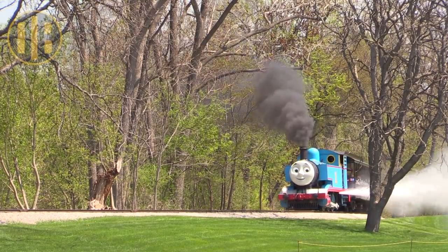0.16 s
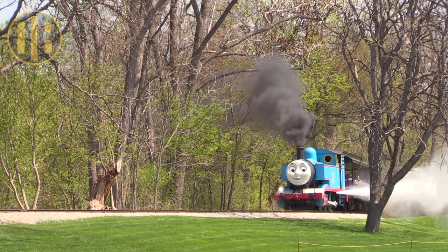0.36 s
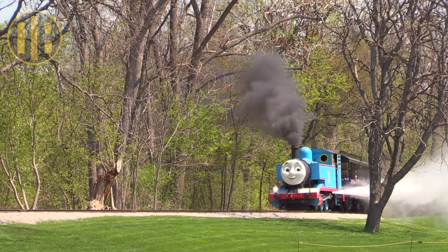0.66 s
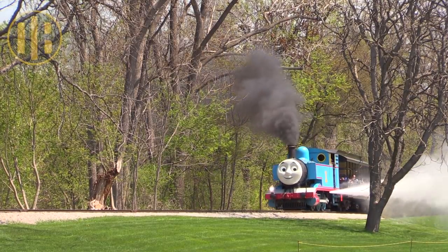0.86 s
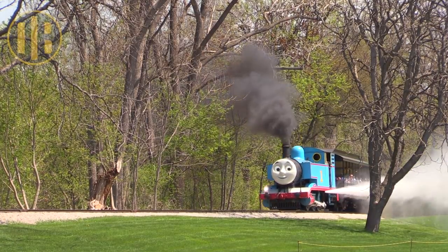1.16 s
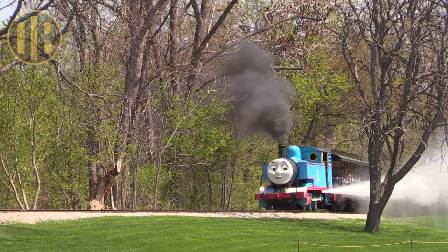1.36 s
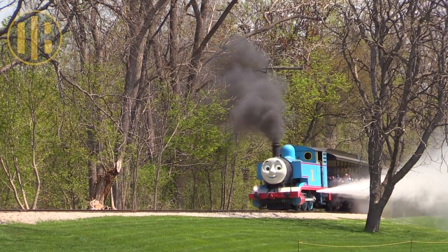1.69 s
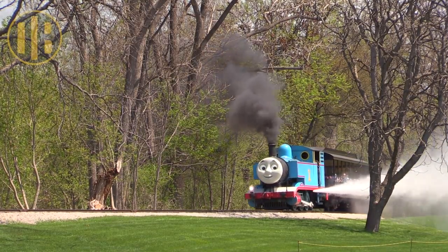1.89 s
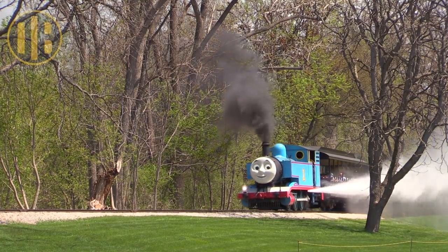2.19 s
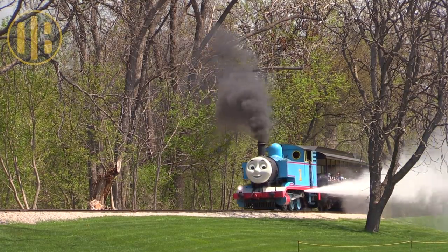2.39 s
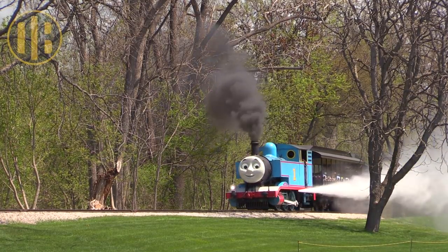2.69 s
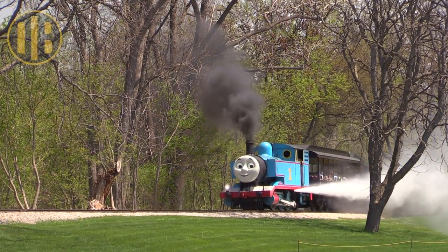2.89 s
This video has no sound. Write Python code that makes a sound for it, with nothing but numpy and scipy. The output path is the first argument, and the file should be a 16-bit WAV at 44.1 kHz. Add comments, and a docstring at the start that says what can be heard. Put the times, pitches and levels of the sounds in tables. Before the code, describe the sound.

Continuous venting steam dominates from start to end, broad and rushing, with tiny pops and a quiet lumpy rumble. A dull low rush fades early. One distant microphone outdoors near trees, with slightly overloaded peaks.

```python
"""A broad, steady hiss is heard first: a jet of steam from the side of a locomotive creeping along some way off.
The jet is coloured noise in overlapping bands; their levels swell and fade, and weak echoes ripple its colour.
A fine crackle of filtered random pulses rides on top; the engine rumbles beneath as low, lumpy noise.
A dull rush of low noise fades from the start, and the loudest peaks slightly overload the recorder."""
import sys
import numpy as np
from scipy import signal
from scipy.fft import rfft, irfft, next_fast_len
from scipy.io import wavfile
from scipy.ndimage import uniform_filter1d, minimum_filter1d, map_coordinates

SR = 44100
rng = np.random.default_rng(int(sys.argv[2]) if len(sys.argv) > 2 else 0)


def master(y):
    """Save y as 16-bit WAV."""
    cut = np.clip(np.atleast_2d(y).T, -1, 1)
    pcm = np.round(cut * 32767)  # scale
    wavfile.write(sys.argv[1], SR, pcm.astype(np.int16))


N = 134505
TIME = np.arange(N) / SR  # s


def from_db(db):
    """Amplitude ratio: 20 dB is a factor of ten."""
    return 10 ** (np.asarray(db) / 20)


def rms_one(x):
    """Normalisation by the root mean square, which becomes 1."""
    return x / np.sqrt(np.mean(x ** 2) + 1e-20)


def in_time(rows):
    """Linear interpolation of each column after the first (time [s]) at every sample."""
    seconds, *columns = np.transpose(rows)
    return np.array([np.interp(TIME, seconds, column) for column in columns])


def drift(rate_hz):
    """Low-pass filtered noise: a slow random wander with a spread of about 1."""
    step = 40  # samples between the points of the wander
    pole = np.exp(-2 * np.pi * rate_hz * step / SR)
    settle = 2000  # points dropped while the filter settles
    noise = rng.standard_normal(N // step + 2 + settle)
    slow = signal.lfilter([1], [1, -2 * pole, pole * pole], noise)[settle:]
    return np.interp(np.arange(N) / step, np.arange(len(slow)), rms_one(slow))


def coloured_noise(spectrum):
    """Spectral shaping of white noise: a looping hiss of the given colour, rms 1."""
    size = next_fast_len(N)
    hz = np.maximum(np.arange(size // 2 + 1) * SR / size, 1)
    points_hz, db = np.transpose(spectrum)
    # beyond the end points the spectrum falls by 12 dB per octave
    ends = np.minimum(1, np.minimum(hz / points_hz[0], points_hz[-1] / hz)) ** 2
    gain = ends * from_db(np.interp(np.log(hz), np.log(points_hz), db))
    return rms_one(irfft(rfft(rng.standard_normal(size)) * gain, size))


def split_bands(x, count=30):
    """Superposition: overlapping bands that sum to x, as (centre [Hz], signal)."""
    log_hz = np.log(np.maximum(np.arange(len(x) // 2 + 1) * SR / len(x), 1))
    centres_hz = np.geomspace(350, 10000, count)
    whole = rfft(x)
    bands = []
    for hz, pick in zip(centres_hz, np.eye(count)):
        weight = np.interp(log_hz, np.log(centres_hz), pick)  # triangle on a log frequency axis
        bands.append((hz, irfft(whole * weight, len(x))[:N]))
    return bands


def steam_jet():
    """Turbulent jet noise: each band follows the slow swell of its range and flutters by itself."""
    # mean colour of the jet, relative: (frequency [Hz], density [dB per Hz])
    jet_colour = [(150, -19), (250, -23), (350, -14.5), (430, -11), (530, -5.5), (680, -4), (850, -2),
                  (1250, 0.5), (1850, -0.5), (2500, 0.1), (2950, -1), (3500, -4), (4200, -12), (5200, -20),
                  (7000, -33), (10000, -51.5), (13000, -61.5), (16000, -67)]
    # lower ranges: (time [s], 500-1100 Hz [dB], 1100-1750 Hz [dB], 1750-2350 Hz [dB], 2350-3050 Hz [dB])
    lower_levels = [(0.0, -19, -22, -20.0, -16.5), (0.12, -19.5, -19.5, -15.5, -16.5),
                    (0.26, -18.5, -19, -14.5, -11.5), (0.45, -18.5, -18.5, -12, -14),
                    (0.62, -19.0, -16, -17.5, -15), (0.78, -19.5, -11.5, -15.5, -15.5),
                    (0.95, -18.5, -14.5, -17, -12), (1.15, -18.5, -16.5, -20, -14.5),
                    (1.38, -16.5, -17.5, -20, -14.5), (1.55, -16, -16, -17, -14.5),
                    (1.72, -16.0, -14, -15.5, -12), (1.95, -16.5, -15.5, -14.5, -12),
                    (2.17, -17, -14, -15.0, -12.5), (2.35, -17.5, -15.5, -16.0, -14),
                    (2.55, -18, -12.5, -17, -19.5), (2.72, -18.0, -15.5, -16, -16.5),
                    (2.87, -17.5, -16.5, -17, -15.5), (3.05, -18.5, -16, -15.5, -16)]
    # treble: (time [s], 3-4.2 kHz [dB], 4.4-6 kHz [dB], 6.3-8.5 kHz [dB])
    treble_levels = [(0.0, -14.5, -28, -36.5), (0.12, -15.5, -24.5, -38.5), (0.26, -14, -26.5, -41.5),
                     (0.45, -14, -28.0, -41.0), (0.62, -13.5, -26, -45), (0.78, -18.5, -28.5, -39.5),
                     (0.95, -19, -30.5, -44), (1.15, -20.5, -32, -47.5), (1.38, -17.5, -32.0, -47),
                     (1.55, -16, -27, -40.5), (1.72, -15.5, -24.5, -40.0), (1.95, -16.5, -26, -41.0),
                     (2.17, -16, -30.5, -39.5), (2.35, -25.5, -29.5, -44.0), (2.55, -25.5, -30, -46.5),
                     (2.72, -22.5, -40, -48.5), (2.87, -22.0, -36, -48), (3.05, -20.5, -30.5, -43.5)]
    # centres of these seven ranges, low to high: (frequency [Hz], ...)
    range_centres_hz = (880, 1380, 2050, 2700, 3550, 5100, 7300)
    jet_db = -12
    flutter_db, flutter_hz = 0.74, 5.5  # turbulence shakes each band by itself
    surge_db, surge_hz = 0.52, 16       # and the whole jet together

    levels_db = np.vstack([in_time(lower_levels), in_time(treble_levels)])
    swells_db = levels_db - levels_db.mean(axis=1, keepdims=True)
    hiss = 0
    for hz, band in split_bands(coloured_noise(jet_colour)):
        # a band between two range centres shares the swells of both
        shares = np.array([np.interp(np.log(hz), np.log(range_centres_hz), pick)
                           for pick in np.eye(len(swells_db))])
        band_db = shares @ swells_db + flutter_db * drift(flutter_hz)
        hiss = hiss + band * from_db(band_db)
    return hiss * from_db(jet_db + surge_db * drift(surge_hz))


def reflected(x):
    """Interference: weak echoes on wandering paths lay a shifting ripple over the colour."""
    # reflections off the engine, the ground and tree trunks: (mean delay [ms], level [dB])
    echoes = [(3.4, -22), (8.9, -24.5), (12.95, -18.5)]
    wander_ms, wander_hz = 0.1, 0.6  # moving air and the engine's creep shift each path
    out = x
    for delay_ms, db in echoes:
        lag = (delay_ms + wander_ms * drift(wander_hz)) * SR / 1000  # samples
        echo = map_coordinates(x, [np.arange(N) - lag], order=3, mode="mirror")
        out = out + from_db(db) * echo
    return out


def crackle():
    """Random impulses through a band-pass: sharp pops that grow denser and stronger together."""
    # crackle above 10 kHz, used as the swing about its mean: (time [s], level [dB])
    crackle_level = [(0.03, -65), (0.07, -65), (0.24, -56), (0.4, -63.5), (0.53, -51.5), (0.54, -59),
                     (0.83, -62), (1.18, -70), (1.53, -64), (1.55, -57), (1.6, -60.5), (1.72, -54.5),
                     (1.74, -60.5), (2.11, -60.5), (2.57, -70), (3.0, -67)]
    pops_per_s, smallest_db = 260, -36.5      # at the mean level, before the band-pass
    spread_db = 3                             # scale of the exponential spread of sizes
    rate_follows, size_follows = 0.7, 0.94    # shares of the swing

    level_db, = in_time(crackle_level)
    swing_db = level_db - level_db.mean()
    born = rng.random(N) < pops_per_s * from_db(rate_follows * swing_db) / SR
    excess_db = spread_db * np.minimum(rng.exponential(1, N), 4)
    sizes = from_db(smallest_db + size_follows * swing_db + excess_db)
    pulses = born * sizes * rng.choice([-1, 1], N)
    band_pass = signal.butter(1, (6000, 10000), "band", fs=SR, output="sos")
    return signal.sosfilt(band_pass, pulses + 1e-18)


def engine_rumble():
    """Amplitude-modulated low noise: the lumpy rumble of the fire and the rolling engine."""
    # colour of the rumble, relative: (frequency [Hz], density [dB per Hz])
    rumble_colour = [(20, -16), (32, -15), (46, -3), (85, -1.5), (135, 0.5), (185, -4.5), (235, -16),
                     (330, -22.5), (600, -33)]
    # course of the rumble, before the gain: (time [s], level [dB])
    rumble_level = [(0.0, -30), (0.03, -22), (0.07, -28.5), (0.29, -27.5), (0.59, -31), (2.21, -30.5),
                    (2.23, -35.5), (2.34, -35.5), (2.43, -30), (2.62, -36.5), (2.81, -29), (2.93, -35.5),
                    (2.97, -28), (3.02, -32)]
    gain_db = 1.5
    level_db, = in_time(rumble_level)
    return from_db(level_db + gain_db) * coloured_noise(rumble_colour)[:N]


def low_rush():
    """Exponential decay of low noise: a dull rush under the hiss, fading steadily in dB."""
    # colour of the rush, relative: (frequency [Hz], density [dB per Hz])
    rush_colour = [(100, -22), (220, -7), (330, 2), (450, 7.5), (800, -17.5)]
    start_db, fade_db_per_s = -29, 8
    return from_db(start_db - fade_db_per_s * TIME) * coloured_noise(rush_colour)[:N]


def scene():
    """Superposition of jet, crackle, rumble and rush at one microphone."""
    hiss = reflected(steam_jet())
    return (hiss + crackle() + engine_rumble() + low_rush())[None]


def record(dry):
    """Limiting and soft saturation: peaks are held, then rounded, and the top is cut."""
    ceiling, window_s = 0.92, 0.003  # full scale is 1
    knee, room = 0.35, 1             # straight up to the knee, then rounded over this range
    cutoff_hz = 15700

    size = int(window_s * SR)
    needed = ceiling / np.maximum(np.abs(dry), ceiling)
    limiter_gain = uniform_filter1d(minimum_filter1d(needed, size), size)
    held = dry * limiter_gain
    straight = np.clip(held, -knee, knee)
    rounded = straight + room * np.tanh((held - straight) / room)
    # steep low-pass: 0.1 dB ripple below the cutoff, 80 dB rejection above
    low_pass = signal.ellip(12, 0.1, 80, cutoff_hz, fs=SR, output="sos")
    return signal.sosfilt(low_pass, rounded)


dry = scene()
out = record(dry)
master(out)
```